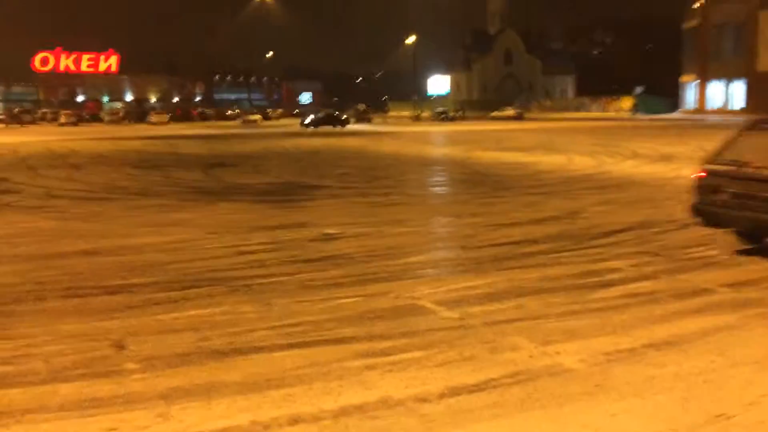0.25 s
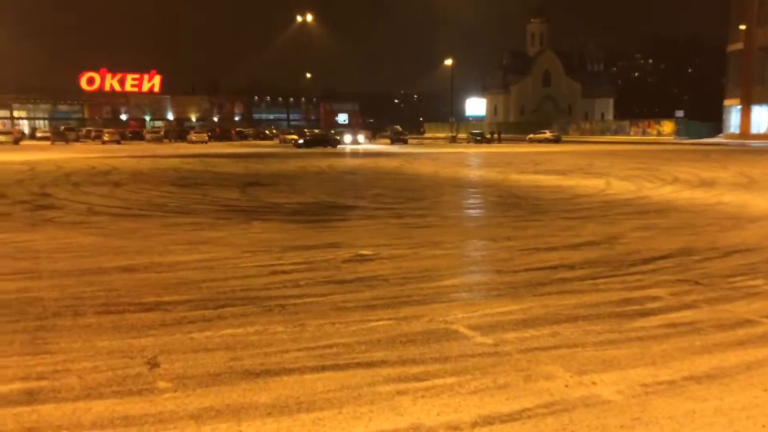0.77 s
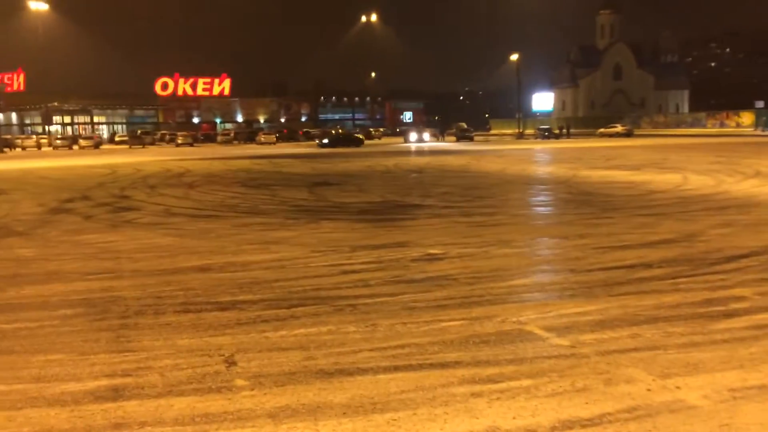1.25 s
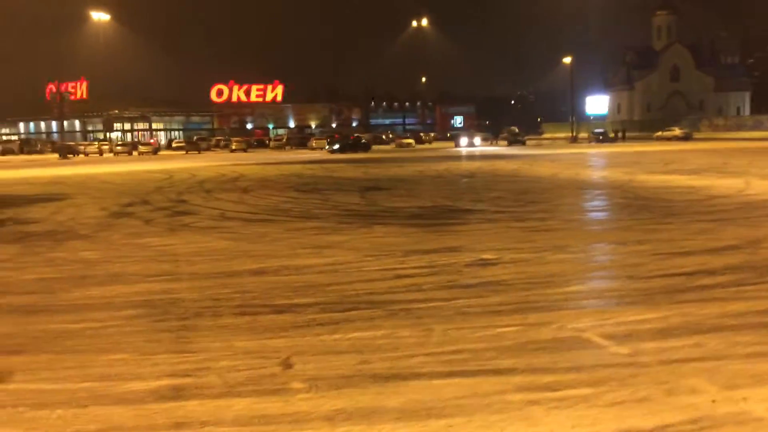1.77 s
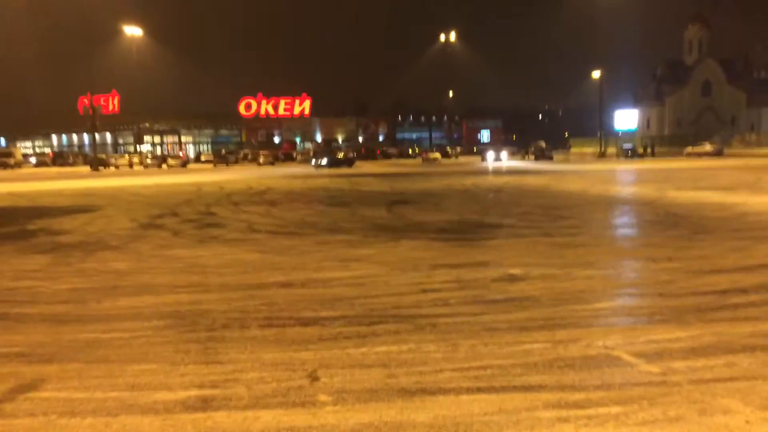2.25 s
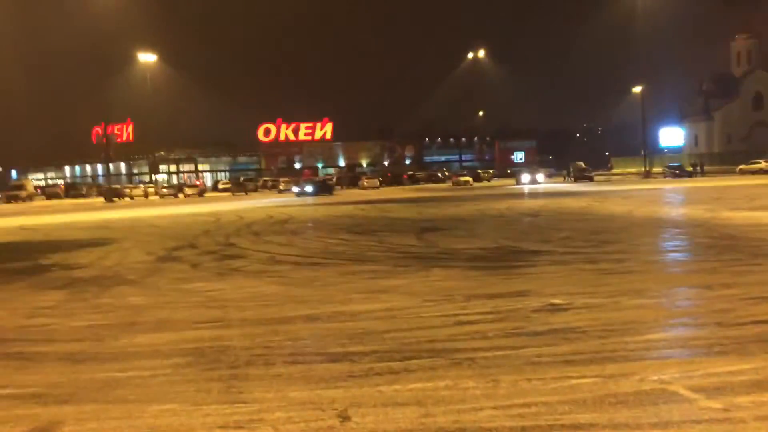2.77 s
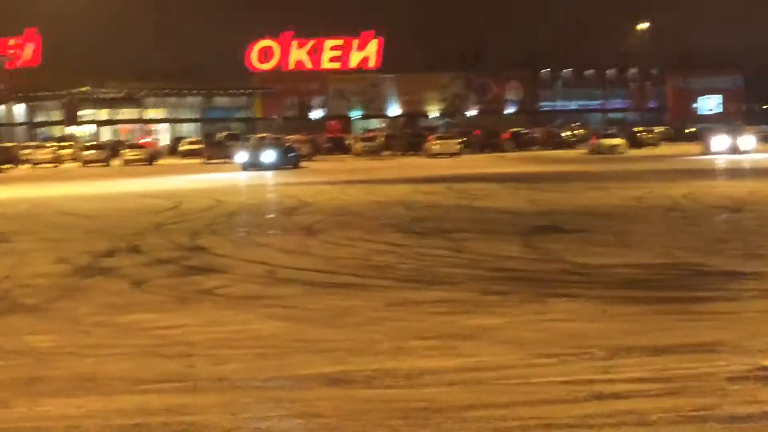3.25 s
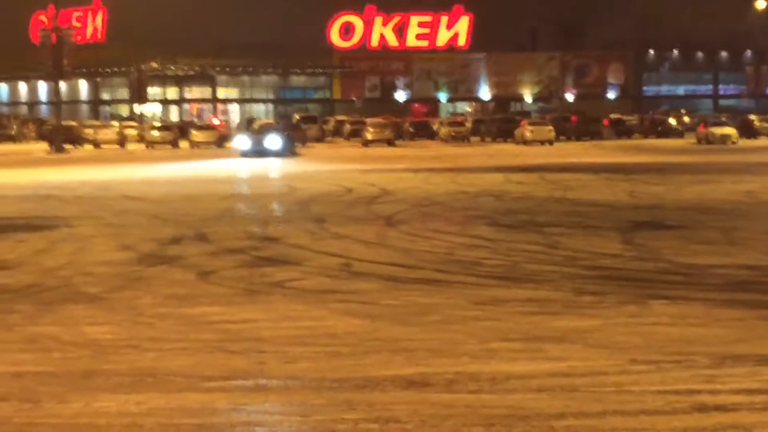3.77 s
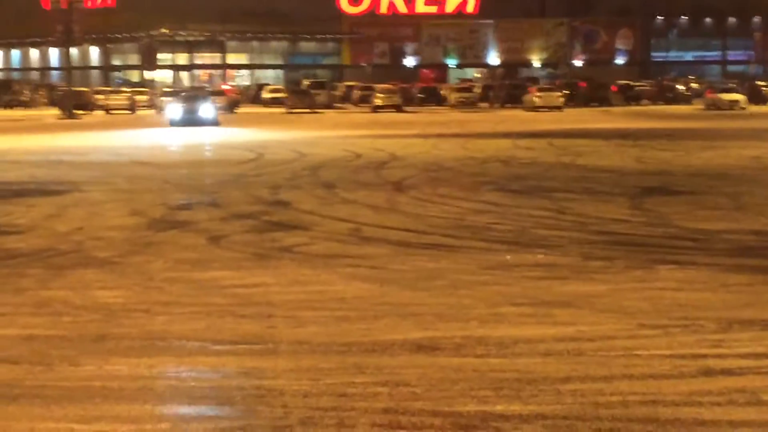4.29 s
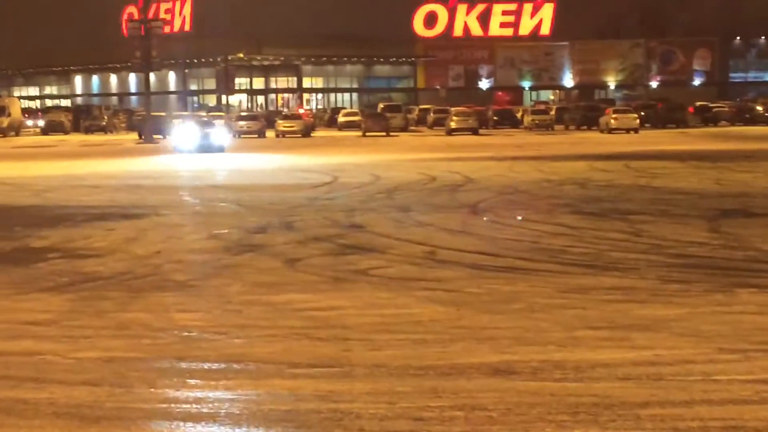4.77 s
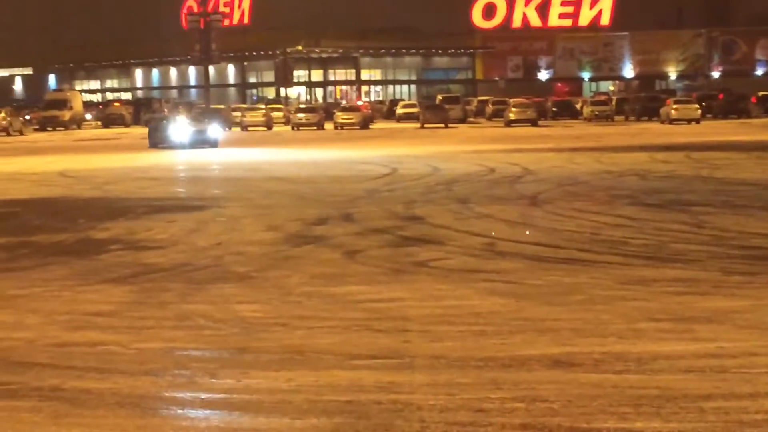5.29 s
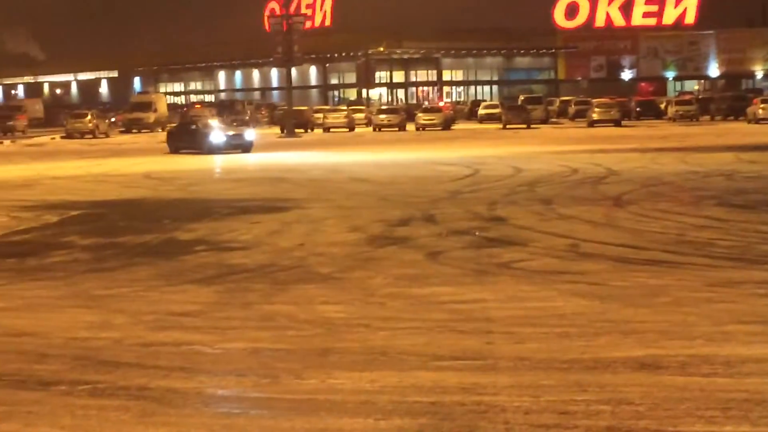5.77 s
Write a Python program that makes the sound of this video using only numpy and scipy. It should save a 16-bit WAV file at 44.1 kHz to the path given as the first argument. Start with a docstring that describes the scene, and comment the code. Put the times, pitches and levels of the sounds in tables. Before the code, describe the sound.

A car slides around a snowy open car park. Snow clods crunch close to the microphone while the engine burbles at low revs, then the throttle opens with a bark. The booming engine note rises, sags a little and climbs higher towards the end, echoing off a shop front. Spinning tyres hiss and scrape throughout, spraying icy grains, with wind rumbling on the microphone and traffic droning far off.

```python
"""A snowy car park, where a five-cylinder car slides and circles away, its revs rising and sagging.
The exhaust booms near 125 Hz, burbles at low revs and beats with its echo from a shop front.
Spinning tyres hiss on packed snow and fling icy grains; clods crunch close to the microphone.
Other cars drone further off, a low hum glides beneath the engine, and wind rumbles on the microphone."""
import sys
import numpy as np
from scipy import signal
from scipy.fft import rfft, irfft, next_fast_len
from scipy.io import wavfile

SR = 44100
rng = np.random.default_rng(int(sys.argv[2]) if len(sys.argv) > 2 else 0)


def master_out(mix):
    """Clip the mix to full scale and print it as 16-bit PCM to the path in sys.argv[1]."""
    frames = np.transpose(np.atleast_2d(mix))
    ceiling = np.clip(frames, -1, 1)
    pcm = np.round(ceiling * 32767).astype(np.int16)
    wavfile.write(sys.argv[1], SR, pcm)


N = 265923
TIME = np.arange(N) / SR


def from_db(db):
    return 10 ** (np.asarray(db) / 20)


def rms_one(x):
    return x / np.sqrt(np.mean(x ** 2) + 1e-20)


def in_time(rows):
    """Each column of a timed table, interpolated at every sample."""
    times, *columns = np.transpose(rows)
    return [np.interp(TIME, times, column) for column in columns]


def at_hz(spectrum, hz):
    """A spectrum's level in dB, read on a log-frequency axis."""
    points_hz, levels_db = np.transpose(spectrum)
    return np.interp(np.log(hz), np.log(points_hz), levels_db)


def swells(events):
    """Smooth bumps from rows of centre in seconds, height and half width in seconds."""
    return sum(height * np.exp(-((TIME - s) / width) ** 2) for s, height, width in events)


def drift(rate_hz):
    """A slow random wander of spread 1."""
    step, settle = 40, 2000
    pole = np.exp(-2 * np.pi * rate_hz * step / SR)
    noise = rng.standard_normal(N // step + settle + 2)
    slow = signal.lfilter([1], [1, -2 * pole, pole * pole], noise)[settle:]
    return np.interp(np.arange(N) / step, np.arange(len(slow)), rms_one(slow))


def coloured(source, spectrum):
    """A white source given a spectrum; rms 1."""
    size = next_fast_len(N)
    hz = np.maximum(np.fft.rfftfreq(size, 1 / SR), 1)
    low_cut = np.minimum(hz / spectrum[0][0], 1) ** 2
    return rms_one(irfft(rfft(source, size) * low_cut * from_db(at_hz(spectrum, hz)), size)[:N])


def grains(per_s, spread_db):
    """Random tiny impacts of uneven size; rms 1."""
    sizes = from_db(spread_db * np.minimum(rng.exponential(1, N), 4)) * rng.choice([-1, 1], N)
    return rms_one(sizes * (rng.random(N) < per_s / SR))


def patchy(source, spectrum, swing_db):
    """A coloured source whose third-octaves swell and sink on their own as the ground changes; rms 1."""
    size = next_fast_len(N)
    whole = rfft(coloured(source, spectrum), size)
    band = 3 * np.log2(np.clip(np.fft.rfftfreq(size, 1 / SR), 630, 5040) / 630)
    parts = (irfft(whole * np.maximum(1 - abs(band - k), 0), size)[:N] for k in range(10))
    return rms_one(sum(part * from_db(swing_db * drift(23)) for part in parts))


# Cars in the distance. Each row: time in seconds, level in dB.
TRAFFIC_LEVEL = [(0, -34), (2, -34.5), (3.9, -38), (5, -33.5), (6.03, -36)]
# Their drone from here. Each row: frequency in Hz, relative density in dB.
TRAFFIC_SPECTRUM = [(40, -15.5), (80, 11.5), (150, 2.5), (220, -8), (320, -8), (450, -8), (700, -7),
                    (2000, -54)]

def distant_traffic():
    """Far-off cars merge into one low drone."""
    level_db, = in_time(TRAFFIC_LEVEL)
    return from_db(level_db) * coloured(rng.standard_normal(N), TRAFFIC_SPECTRUM)


# Gusts right on the microphone. Each row: time in seconds, relative level in dB.
WIND_LEVEL = [(0, -41), (.8, -44), (.9, -35), (1.35, -39.5), (1.75, -31.5), (2.2, -44), (2.6, -35.5),
              (3.3, -35.5), (4.65, -48), (5.05, -34), (5.35, -55), (6.03, -53)]
# Their rumble. Each row: frequency in Hz, relative density in dB.
WIND_SPECTRUM = [(20, 9.5), (35, 14), (55, 18), (85, 14.5), (120, 0), (200, 6.5), (400, -42)]

def wind():
    """Moving air buffets the microphone with a lumpy rumble."""
    level_db, = in_time(WIND_LEVEL)
    return from_db(level_db + 3.0 + 2.4 * drift(7.4)) * coloured(rng.standard_normal(N), WIND_SPECTRUM)


# A hum heard beneath the engine. Each row: time in seconds, pitch in Hz, level in dB.
LOW_HUM = [(0, 58.8, -55), (1.35, 59.43, -33), (1.62, 36, -36), (1.8, 67.3, -30.5), (2.0, 97, -23.5),
           (2.3, 84.55, -33.5), (2.75, 43.94, -41), (3.75, 45.5, -39), (4.15, 74.5, -30.5), (4.8, 89, -57)]

def low_hum():
    """A rough, deep tone that wanders in pitch."""
    hum_hz, hum_db = in_time(LOW_HUM)
    angle = 2 * np.pi * np.cumsum(hum_hz) / SR
    return np.sqrt(2) * from_db(hum_db) * (np.sin(angle) + 0.66 * drift(7.4) * np.cos(angle))


# Snow clods and ice chips close to the microphone.
# Each row: start in seconds, level in dB, pitch in Hz, decay in seconds.
CHIPS = [(.034, -38, 3400, .007), (.062, -33, 2200, .008), (.093, -30, 1700, .007), (.127, -29, 1700, .008),
         (.157, -28, 2000, 0.0069), (.295, -36.5, 3330, 0.013), (.402, -34, 2800, .006),
         (.803, -49, 5800, .026), (.828, -49, 12800, .004), (1.194, -42, 3600, .012),
         (1.672, -56, 10000, .045), (1.844, -57, 12000, 0.0088), (1.97, -62, 12000, 0.031),
         (2.135, -58, 10500, .045)]

def ice_chips():
    """Each chip gives a short crunch of grains that builds quickly and dies away."""
    out = np.zeros(N)
    crunch = grains(per_s=20000, spread_db=0.5)
    for start_s, level_db, hz, decay_s in CHIPS:
        span = slice(int(start_s * SR), int(start_s * SR) + SR // 2)
        age = np.maximum(TIME[span] - start_s, 0) / decay_s
        envelope = np.minimum(age / 0.18, 1) * np.exp(-age)
        octaves = 1.48 * (2000 / hz) ** 0.66   # smaller chips ring more narrowly
        reach = 2 ** (octaves / 2)
        band = signal.butter(2, [hz / reach, min(hz * reach, SR / 2 - 1)], "band", fs=SR, output="sos")
        out[span] += from_db(level_db) * envelope * rms_one(signal.sosfilt(band, crunch[span]))
    return out


# Wheelspin out on the car park. Each row: time in seconds, relative level in dB.
WHEELSPIN = [(0.02, -31.5), (0.07, -28), (0.27, -33), (0.32, -30), (0.85, -34.5), (1.86, -30.5),
             (2.16, -32.5), (2.69, -26), (2.86, -28.5), (3.62, -28), (3.66, -30.5), (4.18, -25.5),
             (4.55, -27), (4.57, -30), (5.06, -25.5), (5.36, -26.5), (5.61, -23.5), (5.98, -29.5)]
# Bare ice under the tyres. Each row: centre in seconds, extra scrape in dB, half width in seconds.
ICE_PATCHES = [(.1, 8, 0.24), (2.74, 5.5, .13), (4.05, 6, .1), (4.5, 5.5, 0.19)]
# Tread on snow, then on ice. Each row: frequency in Hz, relative density in dB.
SCRUB_SPECTRUM = [(300, -15), (470, -11), (600, -14), (800, -1.5), (1000, 1), (1500, 1), (1900, -3.5),
                  (2050, -8.5), (2400, -13), (3200, -25), (7000, -62)]
SCRAPE_SPECTRUM = [(1300, -14), (1900, 4), (2300, 0), (2600, 0.5), (3000, -6), (3600, -10), (6000, -50)]

def tyres():
    """Spinning tread scrubs over packed snow and scrapes harder where it crosses ice."""
    spin_db, = in_time(WHEELSPIN)
    steady_spin_db = -30
    scrape_db = -45 + 0.86 * (spin_db - steady_spin_db) + swells(ICE_PATCHES)
    scrub_gain = from_db(spin_db + 0.43 + .5 * drift(22))   # the tread grips and lets go
    scrub = patchy(grains(per_s=16000, spread_db=2.0), SCRUB_SPECTRUM, swing_db=1.26)
    scrape_gain = from_db(scrape_db + 1.7 * drift(30))
    scrape = patchy(grains(per_s=9000, spread_db=2.0), SCRAPE_SPECTRUM, swing_db=3.25)
    return scrub_gain * scrub + scrape_gain * scrape


# Snow off the wheels. Each row: time in seconds, relative levels of spray and of powder in dB.
THROWN_SNOW = [(0, -43.5, -51.5), (.22, -44, -52.5), (.7, -47.5, -61.5), (1.15, -47.5, -63),
               (1.58, -47.5, -62), (1.78, -45, -59.5), (2.3, -50, -59.5), (2.7, -45.5, -57.5),
               (3.15, -44, -59.5), (3.7, -47.5, -56), (4.15, -45.5, -60), (4.5, -49, -63.5),
               (5.05, -47.5, -64), (5.62, -44.5, -60.5), (6.03, -46, -60)]
# Coarse spray, then fine powder. Each row: frequency in Hz, relative density in dB.
SPRAY_SPECTRUM = [(2000, -22), (3000, 2), (3600, 2), (4400, -1.5), (4900, -5), (5600, -6), (7000, -14.5),
                  (10000, -23), (12000, -36), (15000, -50.5)]
POWDER_SPECTRUM = [(4000, -15.5), (6500, 3.5), (8500, -1), (11000, -3.5), (15000, -8)]
# Brightness of the powder hiss. Each row: time in seconds, gain above 10.5 kHz in dB.
POWDER_TOP_LEVEL = [(0, -0.5), (2.2, -7.5), (2.7, -12.5), (6.03, -8)]

def thrown_snow():
    """The wheels fling spray and icy powder; the powder's hiss starts bright, then turns duller."""
    spray_db, powder_db = in_time(THROWN_SNOW)
    top_db, = in_time(POWDER_TOP_LEVEL)
    spray_gain = from_db(spray_db - 1.65 + 0.76 * drift(15))
    spray = patchy(grains(per_s=18000, spread_db=3.5), SPRAY_SPECTRUM, swing_db=1.18)
    powder = coloured(grains(per_s=8000, spread_db=3.2), POWDER_SPECTRUM)
    top = signal.sosfilt(signal.butter(4, 10500, "high", fs=SR, output="sos"), powder)
    body = signal.sosfilt(signal.butter(4, 10500, fs=SR, output="sos"), powder)
    powder_gain = from_db(powder_db - 1.8 + 0.76 * drift(25))
    return spray_gain * spray + powder_gain * (body + from_db(top_db) * top)


# The echo gains as the car moves off. Each row: time in seconds, level against the direct sound in dB.
ECHO_LEVEL = [(0, -25), (2.2, -30.5), (4.2, -26), (4.8, -9), (5.4, -6), (6.03, -7.5)]

def with_shop_echo(sound, delay_s=.1698):
    """The shop front throws the sound back; as the pitch glides, echo and direct sound beat."""
    echo_db, = in_time(ECHO_LEVEL)
    return sound + from_db(echo_db) * np.interp(TIME - delay_s, TIME, sound, left=0)


# The exhaust pipe's response. Each row: frequency in Hz, gain in dB.
PIPE = [(30, -12.5), (75, -14), (100, -4), (125, 4), (165, -4.5), (195, -14), (250, -16), (360, -25),
        (480, -19.5), (800, -40)]

def pipe_orders(orders, cycle_hz, cycles, rough):
    """A family of engine orders through the pipe; each wavers with the combustion."""
    out = 0
    for multiple, level_db in orders:
        gain = from_db(level_db + at_hz(PIPE, multiple * cycle_hz))
        angle = 2 * np.pi * (multiple * cycles + rng.random())
        out += gain * ((1 + rough * drift(5.6)) * np.sin(angle) + rough * drift(17) * np.cos(angle))
    return np.sqrt(2) * out


# The circling car's revs. Each row: time in seconds, firing rate in Hz.
REVS = [(0.0, 78.1), (0.3, 76.3), (0.62, 67.7), (0.82, 84.5), (1.0, 86), (1.4, 95.9), (1.95, 122.9),
        (2.1, 122.1), (2.8, 111), (3.3, 114.2), (3.6, 112.1), (4.2, 119.8), (4.55, 127.2), (4.95, 134.8),
        (5.22, 136.5), (5.5, 148.6), (5.75, 161.9), (6.03, 169)]
# Exhaust pulses at the microphone, set by throttle and distance.
# Each row: time in seconds, relative level in dB.
DRIVE = [(0, -23), (.55, -27.5), (.81, -18.5), (.87, -9.5), (1.12, -13), (1.7, -13.5), (2.1, -19),
         (2.6, -20.5), (3.3, -21), (4.2, -21), (4.75, -25), (5.1, -19), (5.4, -21), (6.03, -14)]
# The firing note sinks briefly. Each row: centre in seconds, depth in dB, half width in seconds.
NOTE_DIPS = [(3.416, 3.5, 0.048), (3.563, 4, 0.02), (4.615, 3, .06), (4.851, 7, 0.02), (4.965, 3, 0.031)]
# Overtones grow when the engine pulls. Each row: time in seconds, relative level in dB.
OVERTONE_LEVEL = [(0, -22.5), (.35, -27), (.52, -26), (.8, -23.5), (1.3, -20.5), (1.85, -15), (2.4, -27),
                  (3.2, -32), (4.0, -25), (5.1, -25.5), (5.55, -18.5), (6.03, -24)]
# The note's overtones, then the lope and burble of unequal cylinders.
# Each row: multiple of the cycle rate, relative level in dB.
OVERTONES = [(10, 0.5), (15, -3.5), (20, -7.5), (21, -9)]
LOPE = [(3, -21.5), (4, -8.5), (6, 0)]
BURBLE = [(7, -5), (8, 1), (9, -6), (11, 2.5), (12, -3), (13, -3), (14, -11.5), (16, -10)]
# The throttle opens with a bark. Each row: centre in seconds, level in dB, half width in seconds.
BARK = [(.89, -34.5, 0.13)]
# The bark's colour. Each row: frequency in Hz, relative density in dB.
BARK_SPECTRUM = [(120, -17), (230, 2), (300, 0), (380, -14), (600, -31), (1500, -60)]

def engine(cylinders=5, throttle_opens_s=0.83, throttle_ramp_s=0.037):
    """The firing note, its overtones, the cylinders' uneven beat, and gas puffing out at each firing."""
    firing_hz, = in_time(REVS)
    drive_db, = in_time(DRIVE)
    overtone_db, = in_time(OVERTONE_LEVEL)
    cycle_hz = firing_hz / cylinders
    cycles = np.cumsum(cycle_hz * (1 + .002 * drift(11))) / SR
    firing = np.sin(2 * np.pi * cylinders * cycles)
    note_db = drive_db + at_hz(PIPE, firing_hz)
    note = np.sqrt(2) * from_db(note_db - swells(NOTE_DIPS) + 1.3 * drift(14)) * firing
    overtones = from_db(overtone_db) * pipe_orders(OVERTONES, cycle_hz, cycles, rough=0.3)

    steady_drive_db, cruise_hz = -20, 100
    effort_db = drive_db - steady_drive_db
    # With the throttle shut the exhaust burbles more and lopes less.
    shut = np.clip((throttle_opens_s - TIME) / throttle_ramp_s, 0, 1)
    lope_db = -32 + 0.44 * effort_db - 9 * shut
    burble_db = -33 + 0.71 * effort_db + 2 * shut
    burble_db -= 12.5 * np.log2(firing_hz / cruise_hz)   # the engine runs smoother as it speeds up
    lope = from_db(lope_db) * pipe_orders(LOPE, cycle_hz, cycles, rough=0.14)
    burble = from_db(burble_db) * pipe_orders(BURBLE, cycle_hz, cycles, rough=0.33)

    gas = rng.standard_normal(N) * (1 + firing)
    puffs = from_db(note_db - 20) * coloured(gas, PIPE + [(2000, -78)])
    bark = coloured(gas, BARK_SPECTRUM) * swells((s, from_db(db), width) for s, db, width in BARK)
    return note + overtones + lope + burble + puffs + bark


def scene():
    """The car, the snow it throws and the open car park, at one microphone."""
    mix = with_shop_echo(engine()) + low_hum()
    mix += tyres() + thrown_snow() + ice_chips()
    mix += wind() + distant_traffic()
    return mix[None]


def record(dry, cutoff_hz=15250):
    """The recorder cuts the top steeply."""
    return signal.sosfilt(signal.ellip(12, .1, 90, cutoff_hz, fs=SR, output="sos"), dry)


dry = scene()
out = record(dry)
master_out(out)
```